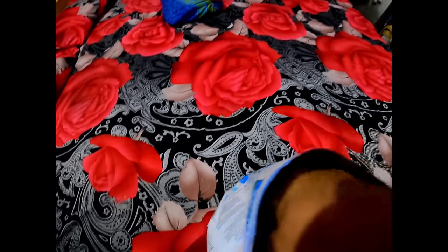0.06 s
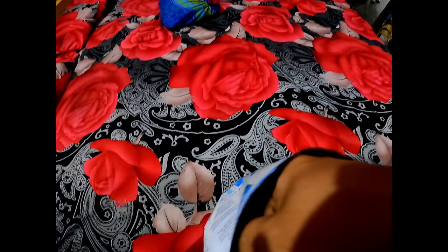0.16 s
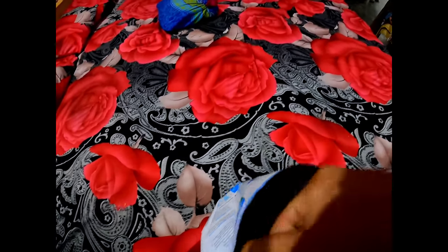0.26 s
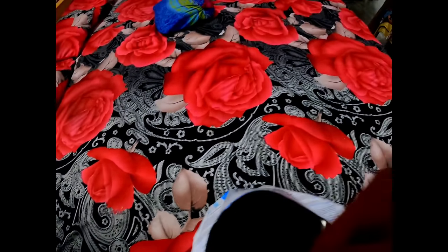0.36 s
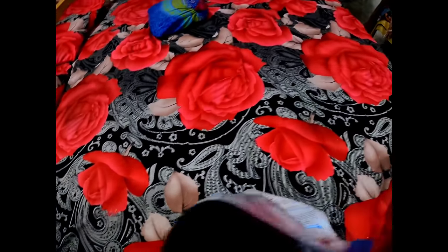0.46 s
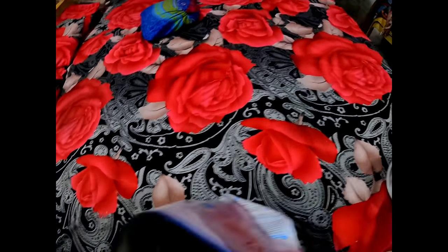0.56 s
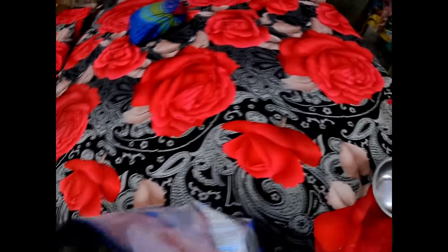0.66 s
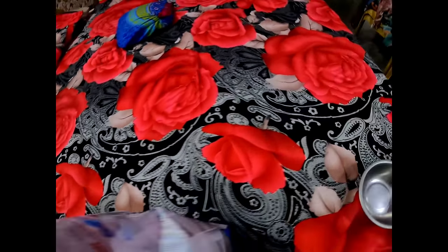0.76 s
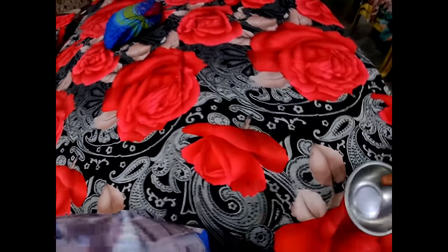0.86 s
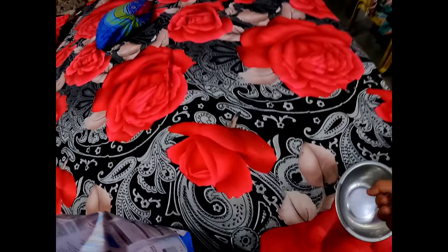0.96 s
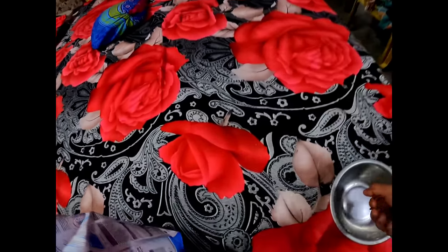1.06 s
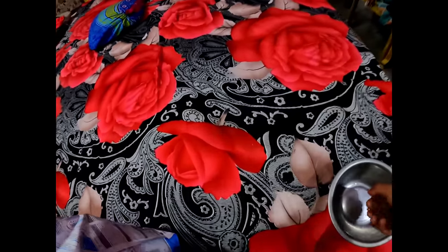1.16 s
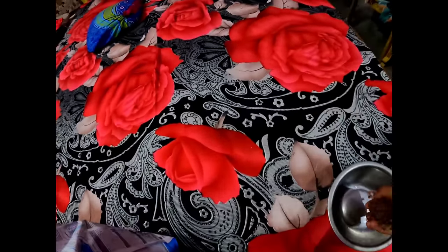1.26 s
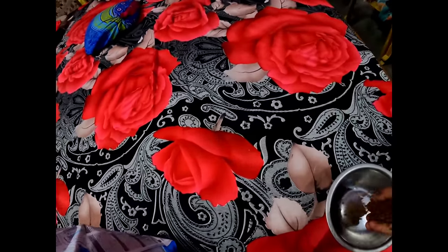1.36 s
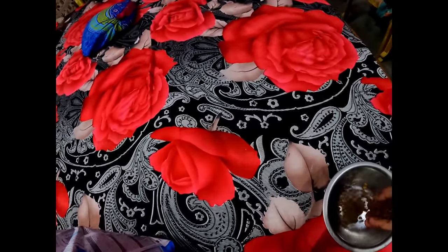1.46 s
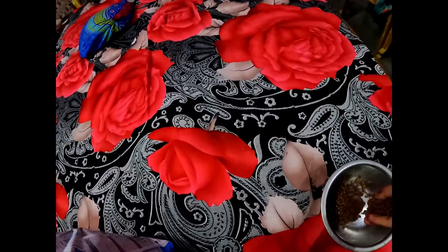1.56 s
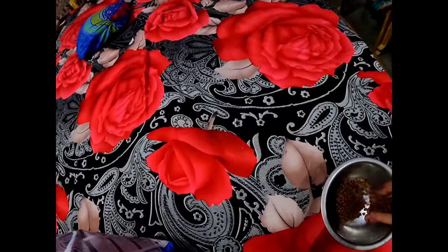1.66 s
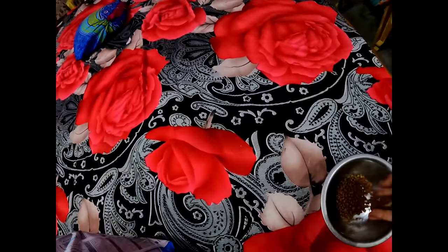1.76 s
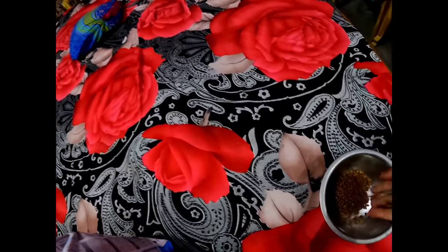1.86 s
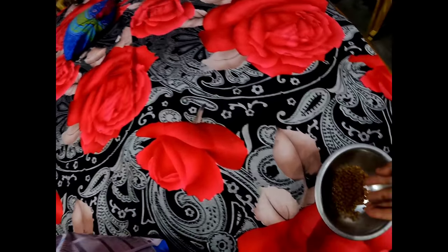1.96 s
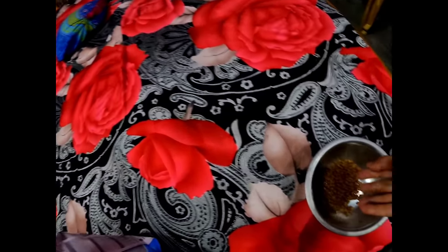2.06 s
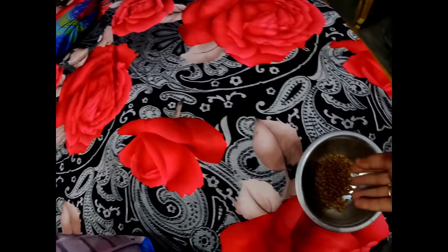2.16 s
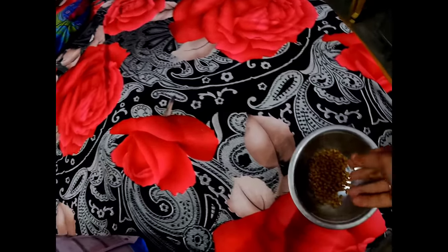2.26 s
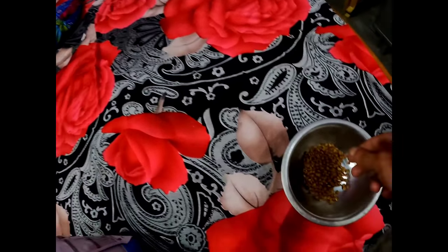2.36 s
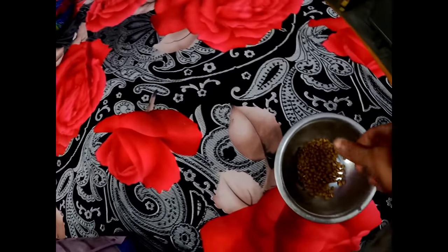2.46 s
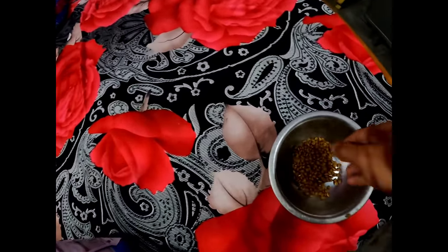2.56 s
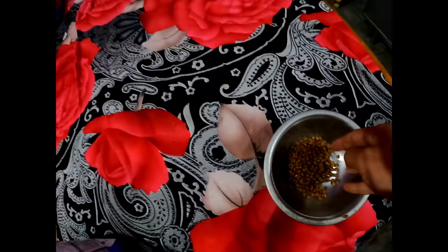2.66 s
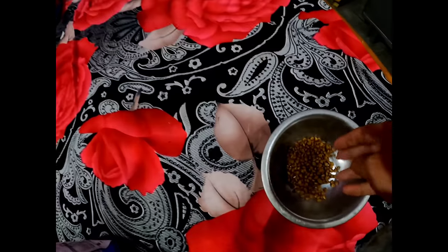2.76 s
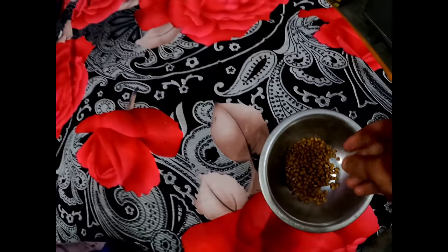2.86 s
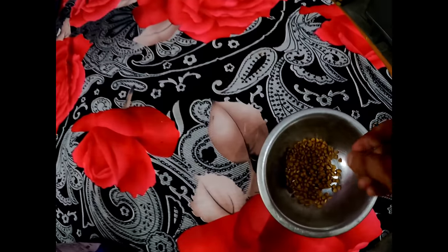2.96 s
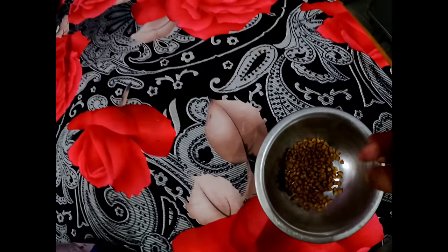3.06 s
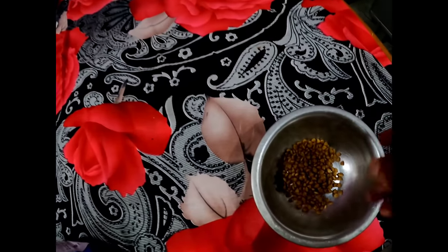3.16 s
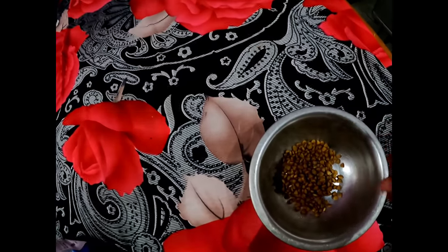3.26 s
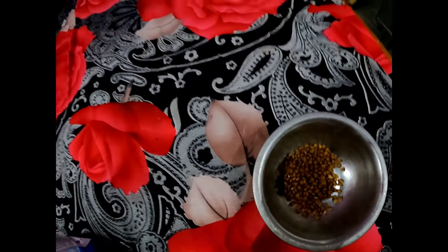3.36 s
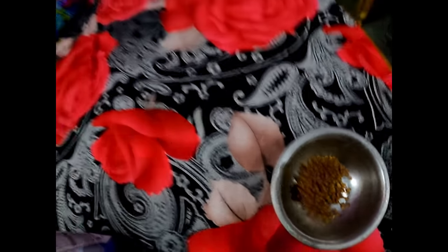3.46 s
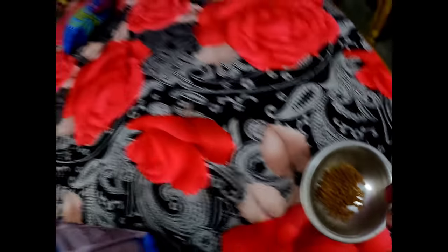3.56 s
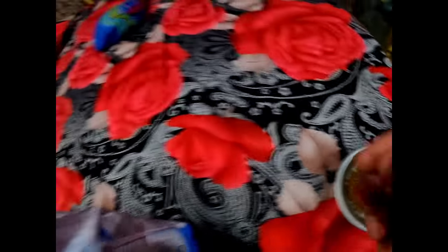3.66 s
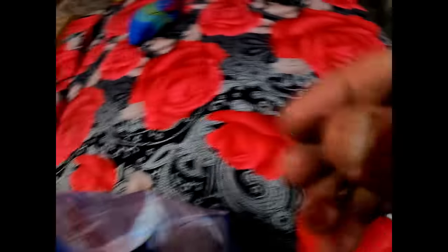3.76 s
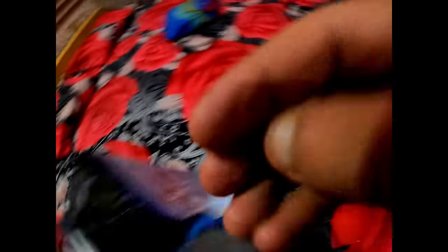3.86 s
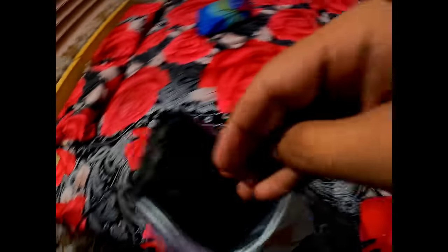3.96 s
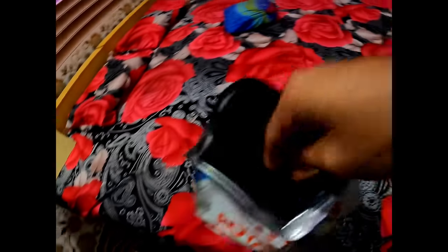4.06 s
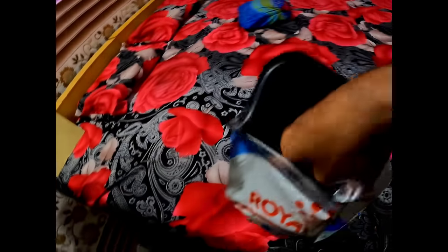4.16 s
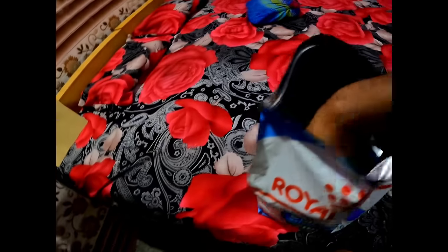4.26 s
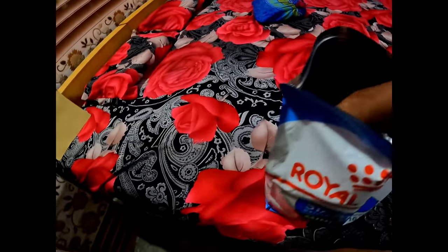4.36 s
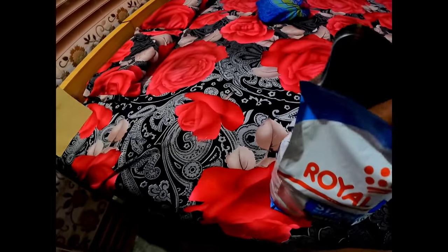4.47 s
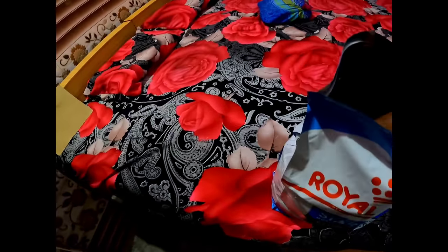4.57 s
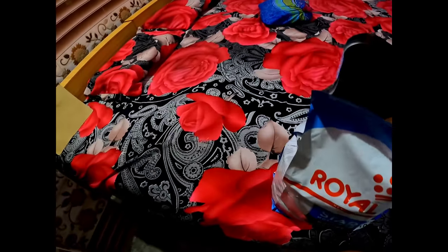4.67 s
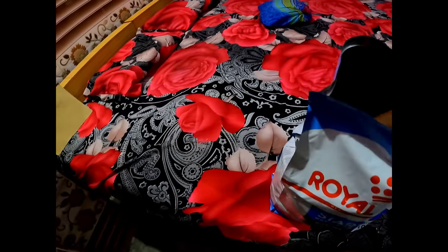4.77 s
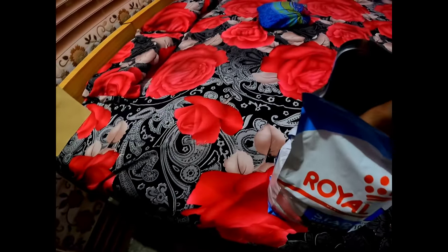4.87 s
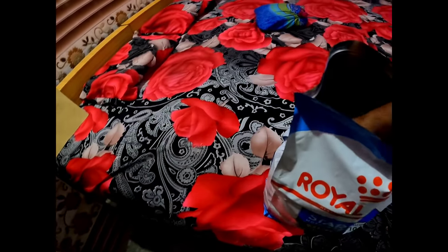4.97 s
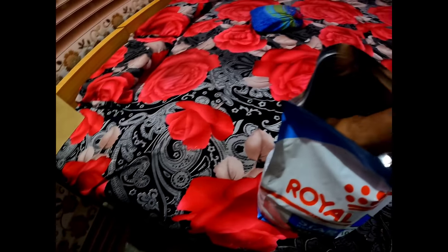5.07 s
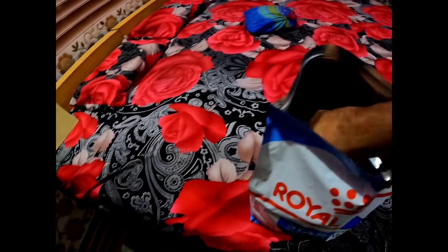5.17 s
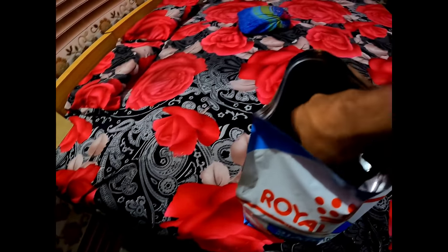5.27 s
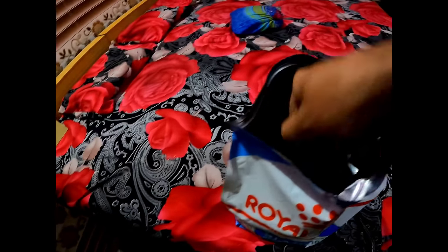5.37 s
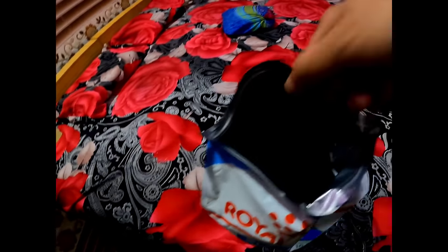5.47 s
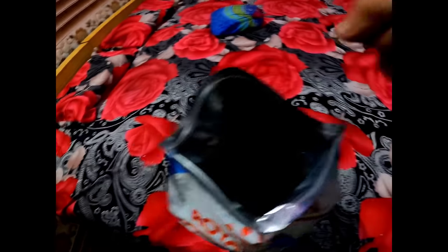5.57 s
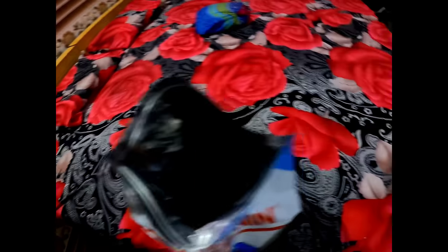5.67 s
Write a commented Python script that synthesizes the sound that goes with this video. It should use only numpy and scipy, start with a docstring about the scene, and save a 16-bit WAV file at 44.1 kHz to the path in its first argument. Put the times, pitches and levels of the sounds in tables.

```python
"""A quiet bedroom: a handful of dry kibble runs into a small steel bowl standing on the bed, close by.
The pellets ring the steel, then click on each other as the heap grows; late ones set the rim ringing.
Before and after, a hand digs in the stiff plastic bag: its panels pop, creases tick and the film rustles.
Handling the bowl gives a few hollow toks. A low hush and a short room tail sit behind it all."""
import sys
import numpy as np
from scipy import signal
from scipy.fft import rfft, irfft
from scipy.io import wavfile
from scipy.ndimage import uniform_filter1d

SR = 44100
rng = np.random.default_rng(int(sys.argv[2]) if len(sys.argv) > 2 else 0)


def write(x):
    x = np.atleast_2d(x).T
    wavfile.write(sys.argv[1], SR, np.round(np.clip(x, -1, 1) * 32767).astype(np.int16))


N = 252252
TIME = np.arange(N) / SR


def undb(db):
    """Decibels to gain."""
    return 10 ** (np.asarray(db) / 20)


def unit(x):
    """Scale to rms 1."""
    return x / np.sqrt(np.mean(x ** 2) + 1e-30)


def unit_hit(x):
    """Scale a one-shot so that its loudest 4 ms have rms 1."""
    return x / np.sqrt(uniform_filter1d(x ** 2, size=176, mode="constant").max() + 1e-30)


def add(track, s, x):
    """Drop a one-shot into a track at s seconds."""
    start = int(s * SR)
    track[start:start + len(x)] += x[:N - start]


def decay(t60, size=8192):
    """An envelope that falls 60 dB in t60 seconds."""
    return np.exp(-np.log(1000) * TIME[:size] / t60)


def burst(t60, size=8192):
    """Noise that dies away."""
    return rng.standard_normal(size) * decay(t60, size)


def band(x, lo_hz, hi_hz, order=3):
    """Causal band-pass."""
    sos = signal.butter(order, [lo_hz, min(hi_hz, SR / 2 - 1)], "band", fs=SR, output="sos")
    return signal.sosfilt(sos, x + 1e-18)


def eq(x, points, size=2048):
    """Minimum-phase EQ through points of (frequency [Hz], gain [dB])."""
    hz, db = np.transpose(points)
    curve_db = np.interp(np.log(np.fft.rfftfreq(size, 1 / SR) + 1), np.log(hz), db)
    cepstrum = irfft(np.log(undb(curve_db)))[:size // 2]
    cepstrum[0] /= 2
    impulse = irfft(np.exp(rfft(2 * cepstrum, size)))
    return signal.fftconvolve(x, impulse)[:len(x)]


def contacts(per_s, spread_db):
    """Random impulses of uneven size, with mean power near 1."""
    size = undb(spread_db * np.minimum(rng.standard_normal(N), 2))
    return (rng.random(N) < per_s / SR) * unit(size) * np.sqrt(SR / per_s)


def scatter(hits):
    """Every contact lands on another spot, so it pushes a mode with its own sign and strength."""
    return hits * rng.uniform(-1.04, 1, N) * np.sqrt(3)


def ring(modes):
    """One second of damped sines, struck together."""
    phases = rng.uniform(0, 2 * np.pi, len(modes))
    return unit_hit(sum(undb(db) * decay(t60, SR) * np.sin(2 * np.pi * hz * TIME[:SR] + phase)
                        for (hz, db, t60), phase in zip(modes, phases)))


# dark tilt of the room tone: (frequency [Hz], gain [dB])
HUSH_EQ = [(18, 8.5), (30, -2.5), (81, -9.5), (120, -4.5), (270, -10.5), (389, -8), (467, -8.5), (561, -9),
           (767, -9.5), (1400, -10.5), (1870, -18), (3590, -19), (15500, -29)]
def room_tone():
    """The steady background hush of the room."""
    return undb(-64.5) * unit(eq(rng.standard_normal(N), HUSH_EQ))


def room_reverb(x):
    """A small furnished bedroom: a short tail, shorter still in the treble."""
    mids = band(burst(t60=.38, size=SR // 2), 190, 1691)
    treble = band(burst(t60=.33, size=SR // 2), 1900, 14000, order=2)
    tail = (mids + undb(2) * treble) * np.minimum(TIME[:SR // 2] / 0.0047, 1)
    return signal.fftconvolve(x, tail / np.linalg.norm(tail))[:N]


# cues for handling the bowl: (time [s], level [dB], pitch [Hz])
TOK_CUES = [(0.767, -39, 1074), (2.338, -60, 520), (2.395, -49.5, 395), (2.822, -46, 1000)]
# partials of a tok: (ratio to pitch [x], level [dB], t60 [s])
TOK_PARTIALS = [(1, 0, .022), (1.12, -8, .014), (3.38, -14, .012), (6.3, -23, .006)]
def bowl_toks():
    """Short hollow knocks from a soft contact, damped at once by the hand."""
    out = np.zeros(N)
    attack = np.minimum(TIME[:SR] / 0.00082, 1)
    for s, db, hz in TOK_CUES:
        modes = [(hz * ratio, partial_db, t60) for ratio, partial_db, t60 in TOK_PARTIALS]
        add(out, s, undb(db) * attack * ring(modes))
    return band(out, 380, 11000, order=2)


def stroke(start, length, attack_share=0.24, release_t60=0.43):
    """Attack, hold and release of one hand movement; a longer one swells more slowly."""
    attack = np.clip((TIME - start) / (attack_share * length), 0, 1)
    release = np.exp(-np.log(1000) * np.maximum(TIME - start - length, 0) / release_t60)
    return attack * release


# dull body of the bag's hollow: (frequency [Hz], gain [dB])
HOLLOW_EQ = [(29, -53), (50, -17), (85, -6.5), (166, -0.5), (211, -7), (277, 0), (377, -3), (418, -3),
             (688, -1.5), (952, -8), (1210, -8.5), (2020, -35.5), (3000, -33.5), (3900, -52), (6600, -120)]
# crisp voice of its film: (frequency [Hz], gain [dB])
FILM_EQ = [(880, -40.5), (1500, 3.5), (2490, -2.5), (4440, 0), (4990, -5.5), (6820, -5), (8460, -11),
           (9990, -12.5), (13800, -27), (15500, -22)]
# hand moves in the bag: (start [s], length [s], rummage level [dB], bass boost [dB], film level [dB])
HAND_STROKES = [(0.0, 0.18, -72, -3, -87), (0.194, 0.2, -59, 10, -68.5), (0.437, 0.02, -55, 6.5, -59.5),
                (0.749, 0.08, -65.5, -2.5, -62.5), (0.916, 0.24, -71.5, 7, -69.5),
                (1.195, 0.19, -74.5, -6, -63.5), (3.75, .08, -71.5, -7, -72.5),
                (3.951, 0.017, -67.5, 8.5, -62), (4.318, 0.06, -51.5, 7, -56),
                (4.402, 0.038, -55, 10, -54.5), (4.419, 0.3, -54.5, -3, -60.5),
                (4.839, 0.14, -49, -17, -62), (4.953, 0.31, -59.5, -5, -70), (5.338, 0.15, -65.5, 9, -67),
                (5.54, 0.015, -50.5, 4, -56), (5.575, 0.014, -59.5, 12, -61)]
def bag_rustle():
    """Kibble shifts dully inside the bag while the film slides and crinkles; brisk sliding sizzles."""
    shifts = scatter(contacts(260, spread_db=0.5)) + undb(-3.5) * rng.standard_normal(N)
    rummage = unit(eq(shifts, HOLLOW_EQ))
    bass = signal.sosfiltfilt(signal.butter(3, 223, fs=SR, output="sos"), rummage)
    crinkles = scatter(contacts(1100, spread_db=7)) + undb(3.5) * rng.standard_normal(N)
    slide = unit(eq(crinkles, FILM_EQ))
    sizzle = unit(band(scatter(contacts(1500, spread_db=6)), 8500, 14000, order=2))
    rummage_gain, bass_gain, film_gain = np.zeros((3, N))
    for start, length, rummage_db, boost_db, film_db in HAND_STROKES:
        move = stroke(start, length)
        rummage_gain = np.maximum(rummage_gain, undb(rummage_db) * move)
        bass_gain = np.maximum(bass_gain, undb(rummage_db + boost_db) * move)
        film_gain = np.maximum(film_gain, undb(film_db) * move)
    briskness = (film_gain / undb(-47)) ** .7  # the sizzle grows faster than the slide
    film = slide + undb(-5.5) * briskness * sizzle
    return rummage_gain * (rummage - bass) + bass_gain * bass + film_gain * film


# crease ticks: (time [s], relative level [dB], pitch [Hz])
CREASE_CUES = [(0.162, -43, 5330), (0.192, -38.5, 6350), (0.208, -46, 3700), (0.4233, -30.5, 2050),
               (0.4268, -38, 3260), (0.4499, -30.5, 4230), (4.416, -38.5, 9500), (5.563, -30.5, 4440)]
def bag_creases():
    """Small creases in the plastic film flip with a sharp tick."""
    out = np.zeros(N)
    for s, db, hz in CREASE_CUES:
        tick = unit_hit(band(burst(0.0093), hz / 1.25, hz * 1.17, order=1))
        add(out, s, undb(db - 16.5) * tick)
    return out


# bag panels snapping through: (time [s], relative level [dB], pitch [Hz])
POP_CUES = [(0.204, -45.5, 560), (0.231, -37.5, 550), (0.384, -44, 620), (0.578, -28, 460),
            (0.951, -46, 790), (0.961, -43.5, 527), (3.972, -48, 1250), (4.353, -24.5, 504),
            (4.366, -31, 713), (4.397, -39, 590), (4.589, -35, 393), (4.692, -34.5, 260), (4.862, -38, 790),
            (4.883, -32.5, 676), (4.917, -34.5, 743), (4.946, -35, 694), (5.164, -41.5, 610),
            (5.390, -39.5, 624), (5.435, -43, 710), (5.509, -38, 570)]
def bag_pops():
    """A buckling panel cracks and swings at its own pitch; the air in the bag booms a little later."""
    out, t = np.zeros(N), TIME[:8192]
    for s, db, hz in POP_CUES:
        swing = unit_hit(np.sin(2 * np.pi * hz * t) * decay(0.045))
        flutter = unit_hit(band(burst(0.12), 343, 1190))
        boom = unit_hit(band(burst(0.014) * np.minimum(t / 0.0097, 1), 162, 232, order=2))
        crack = unit_hit(band(burst(0.01), 2430, 5900))
        boom_db = -19 + 12 * np.log2(530 / hz)  # larger, lower panels boom more
        crack_db = -14.5 + 0.57 * (db + 23.5)  # harder pops crack more
        pop = undb(-7.5) * swing + undb(-10) * flutter + undb(boom_db) * boom + undb(crack_db) * crack
        add(out, s, undb(db) * pop)
    return band(out, 107, 22000, order=2)  # a high-pass trims the deep thump from each pop's onset


# light taps on the rim: (time [s], relative level [dB])
RIM_CUES = [(2.598, -47.5), (2.6196, -38.5), (2.628, -41), (2.639, -41.5), (2.709, -49), (2.835, -55),
            (2.891, -60), (3.001, -62)]
# modes of the free rim, a few in beating pairs: (frequency [Hz], level [dB], t60 [s])
RIM_MODES = [(1890, -8, .24), (2977, -13, .42), (2992, -14, .36), (3924, -2, .15), (4450, -18, .3),
             (5916, -15, .42), (6320, -11, .65), (6745, -13, 1.05), (7214, -15, .75), (7730, -12, .65),
             (8258, -6, .55), (8403, -14, .6), (8538, -5, .23), (8758, 1, .22), (9110, 0, .3),
             (9305, -4, .3), (9785, -1, .28), (10028, -4, .38), (10450, -9, .33), (10900, -11, .3),
             (11820, -13, .4)]
# its wash of crowded, short-lived modes: (frequency [Hz], gain [dB])
SHIMMER_EQ = [(900, -29), (1850, -21), (2300, -28.5), (4300, -25), (7900, -29), (8800, -4.5), (10000, -8),
              (10900, -12), (12300, -11), (14000, -26), (15500, -22.5)]
def bowl_rim():
    """The bare rim rings on: a bright shimmer, then a few pure tones."""
    out = np.zeros(N)
    for s, db in RIM_CUES:
        shimmer = eq(burst(0.024, size=SR) + undb(-4) * burst(0.089, size=SR), SHIMMER_EQ)
        add(out, s, undb(db) * (undb(-6) * ring(RIM_MODES) + undb(2) * unit_hit(shimmer)))
    return out


def heap(s):
    """Share of the bowl's floor that kibble covers at s seconds."""
    return np.clip((s - 1.58) / 0.25, 0, 1)


def steel(hits, modes):
    """Impacts ring a bank of damped resonators; make-up gain keeps the power."""
    out, power = 0, 0
    for hz, width, db in modes:
        b, a = signal.iirpeak(hz, hz / width, fs=SR)
        out = out + undb(db) * signal.lfilter(b, a, scatter(hits) + 1e-18)
        power += undb(db) ** 2 * np.pi * width / SR
    return out / np.sqrt(power)


# close-set resonances of the bowl's bottom: (frequency [Hz], level [dB])
BOTTOM_MODES = [(834.4, -56), (877.5, -57), (1098, -55), (1136, -56), (1238, -58), (1346, -60), (1470, -61),
                (1669, -54), (1701, -57), (1943, -57), (2067, -55), (2304, -63)]
# wall resonances, damped by the kibble: (frequency [Hz], base bandwidth [Hz], level [dB])
WALL_MODES = [(3200, 130, -8), (4320, 110, -5.5), (4510, 31, -11), (5320, 29, -13), (5620, 55, -1),
              (5970, 90, -13), (6810, 67, -11), (7210, 47, -6), (7460, 55, -12), (8940, 46, -6),
              (9410, 120, -5), (9920, 25, -9), (10100, 52, -4), (10500, 62, -9), (11300, 91, 0),
              (12300, 190, -10), (12800, 120, -11), (13200, 120, -10), (13600, 130, -10), (13900, 36, -11),
              (14200, 83, -13), (15400, 94, -17)]
def bowl_body(hits):
    """Impacts ring the steel bottom and wall; the growing heap shields the wall."""
    bottom = steel(hits, [(hz, 20, db) for hz, db in BOTTOM_MODES])
    bottom = band(bottom, 785, 3200, order=5)
    # the lower wall modes ring more freely than the crowded upper ones: half the bandwidth
    low_wall = steel(hits, [(hz, width / 2, db) for hz, width, db in WALL_MODES if hz < 8000])
    low_wall = band(low_wall, 2800, 8200, order=2)
    high_wall = steel(hits, [(hz, width, db) for hz, width, db in WALL_MODES if hz >= 8000])
    high_wall = band(high_wall, 8000, SR / 2, order=2)
    wall = undb(-10.5) * low_wall + undb(-5) * high_wall
    return undb(-9 + 1.2 * heap(TIME)) * bottom + undb(-5 * heap(TIME)) * wall


# pellets that stand out: (time [s], relative level [dB], relative splash level [dB])
PELLET_CUES = [(1.392, -34, -40), (1.405, -28.5, -45), (1.416, -32.5, -37), (1.429, -30, -26.5),
               (1.528, -19.5, -25.5), (1.749, -36, -29), (1.834, -30, -32.5), (2.051, -35.5, -35.5),
               (2.074, -33.5, -35), (2.149, -40, -54), (2.165, -45.5, -52), (2.223, -47.5, -53),
               (2.265, -40.5, -71), (2.289, -39, -42), (2.328, -43, -48), (2.392, -43.5, -78),
               (2.436, -52.5, -80), (2.725, -37.5, -66), (2.804, -44, -59), (2.832, -39, -43),
               (2.892, -51, -45), (2.916, -53.5, -50), (3.008, -58, -49.5)]
def lone_pellets():
    """Each pellet gives a knock, a click and a treble splash; on bare steel it mostly rings the bowl."""
    out, hits = np.zeros((2, N))
    push_db, cushion_db, on_heap_db = 14, -5, 1.5  # the heap softens the push, lifts knock and click
    for s, db, splash_db in PELLET_CUES:
        knock = undb(-11.5) * unit_hit(band(burst(0.012), 803, 1760, order=4))
        click = undb(-12.5) * unit_hit(band(burst(0.0075), 2500, 7200, order=2))
        splash = undb(-6.5) * unit_hit(band(burst(0.029), 9270, 13100))
        add(out, s, undb(db + on_heap_db * heap(s)) * (knock + click) + undb(splash_db) * splash)
        add(hits, s, undb([db + push_db + cushion_db * heap(s)]))
    return out + bowl_body(hits)


# gushes of kibble leaving the hand: (start [s], length [s], level [dB])
GUSH_CUES = [(1.401, 0.065, -35), (1.433, .06, -32.5), (1.526, 0.14, -28.5), (1.862, 0.065, -41.5),
             (2.097, 0.13, -61)]
def kibble_flow(sag_db_per_s=22, die_db_per_s=88):
    """Envelope of the stream: each gush starts at once, sags, and dies away as the pellets settle."""
    flow = np.zeros(N)
    for start, length, db in GUSH_CUES:
        age = TIME - start
        sag_db = sag_db_per_s * np.clip(age, 0, length)
        die_db = die_db_per_s * np.maximum(age - length, 0)
        flow = np.maximum(flow, (age > 0) * undb(db - sag_db - die_db))
    return flow


# tone of pellet against pellet: (frequency [Hz], gain [dB])
CLICK_EQ = [(200, -24.5), (560, -10.5), (800, -10), (1100, 4), (1500, -6), (1980, -2), (2250, -20.5),
            (4000, -12), (5000, -23), (7000, -12), (8100, -16.5), (9400, -14.5), (11300, -7),
            (15500, -37.5)]
def kibble_pour():
    """A faster stream means more and harder impacts; as the heap grows, more land on other pellets."""
    flow = kibble_flow()
    hits = flow * contacts(280 + 1400 * flow / flow.max(), spread_db=4)
    # rough pellets touch several times within a few milliseconds
    smear = decay(0.00574) ** 2 / np.sum(decay(.006) ** 2)
    click_power = np.abs(signal.fftconvolve(hits ** 2, smear)[:N])
    clicks = unit(eq(np.sqrt(click_power) * rng.standard_normal(N), CLICK_EQ)) * np.std(hits)
    rattle = bowl_body(hits) + undb(-8 + 11.94 * heap(TIME)) * clicks
    # landings on bare steel are brighter than those on the heap
    treble = signal.sosfiltfilt(signal.butter(2, 8500, "high", fs=SR, output="sos"), rattle)
    shelf_db = -2 - 2 * heap(TIME)
    return rattle + (undb(shelf_db) - 1) * treble


def scene():
    """Bowl and bag sit dead centre in the room; only the hush has a little stereo width."""
    rattle = kibble_pour() + lone_pellets()
    # below its lowest mode the bowl radiates weakly
    radiated = signal.sosfilt(signal.butter(8, 720, "high", fs=SR, output="sos"), rattle)
    kibble = radiated + undb(-8) * rattle + bowl_rim()
    bag = bag_pops() + bag_creases() + bag_rustle()
    reverb_send = undb(-7.5) * kibble + undb(-8) * bag
    mid = kibble + bag + bowl_toks() + room_reverb(reverb_send) + room_tone()
    side = undb(-17) * room_tone()
    return np.array([mid + side, mid - side])


def record(dry):
    """A steep low-pass cuts the top above 15.5 kHz."""
    return signal.sosfilt(signal.ellip(10, .2, 80, 15500, fs=SR, output="sos"), dry)


dry = scene()
out = record(dry)
write(out)
```